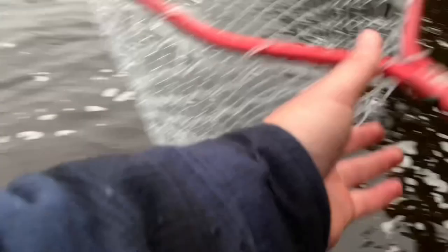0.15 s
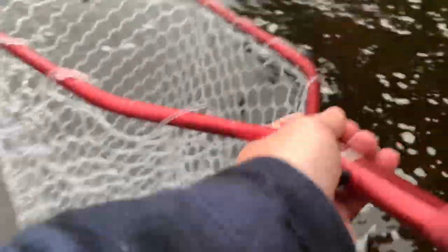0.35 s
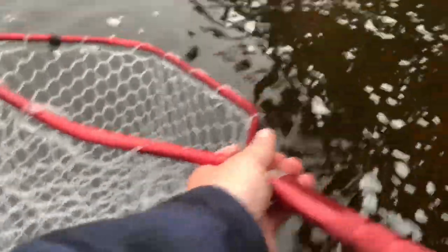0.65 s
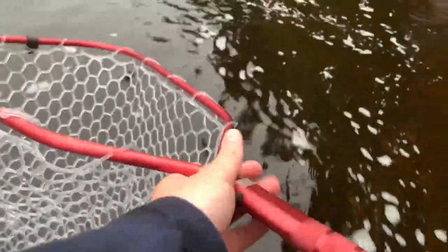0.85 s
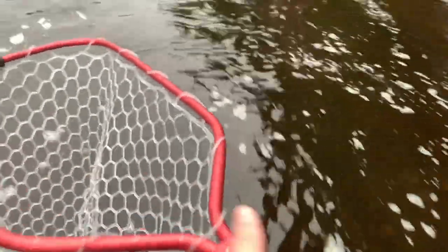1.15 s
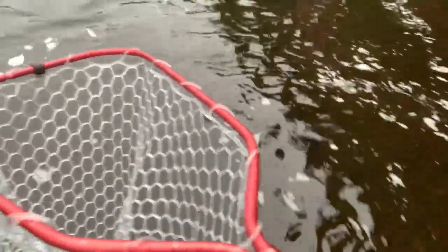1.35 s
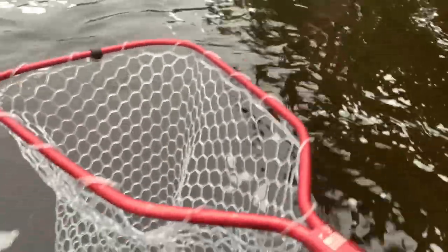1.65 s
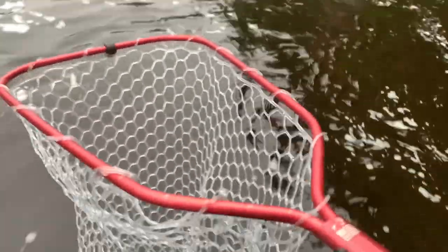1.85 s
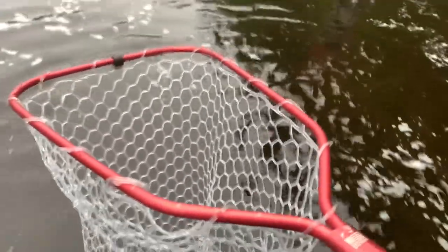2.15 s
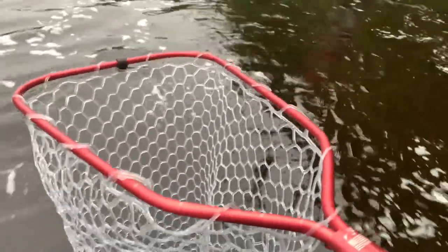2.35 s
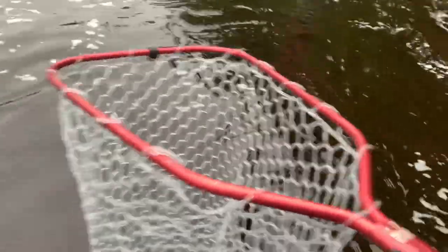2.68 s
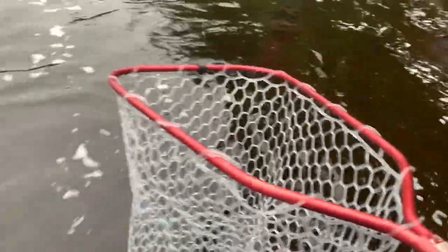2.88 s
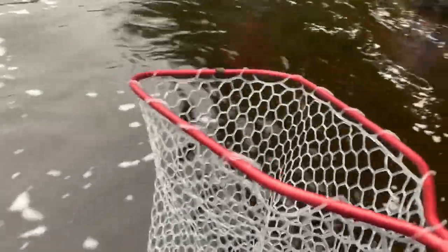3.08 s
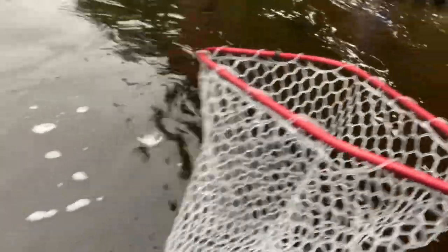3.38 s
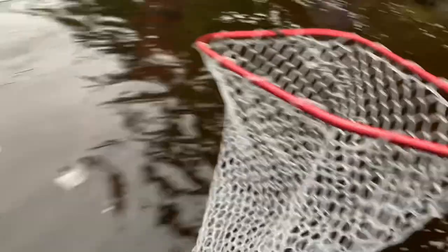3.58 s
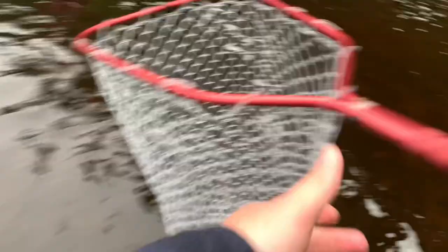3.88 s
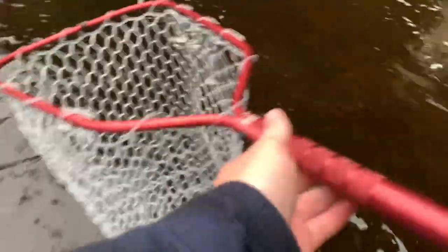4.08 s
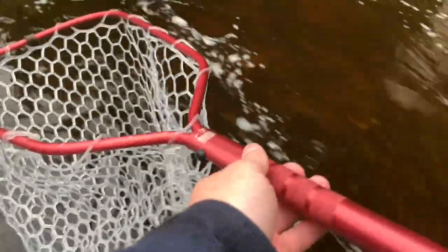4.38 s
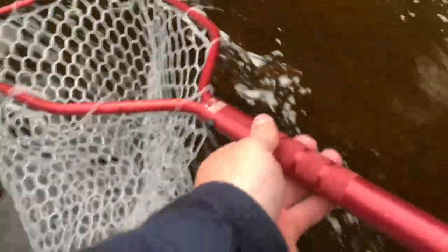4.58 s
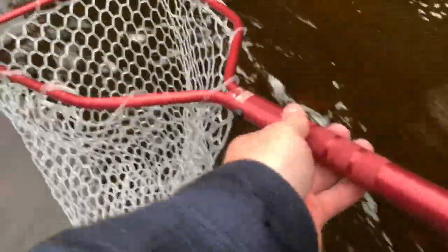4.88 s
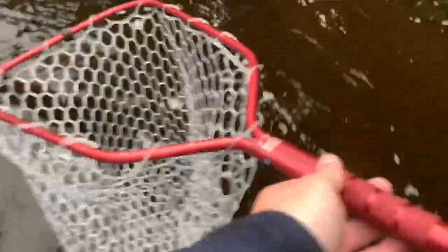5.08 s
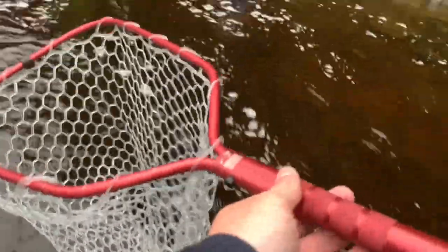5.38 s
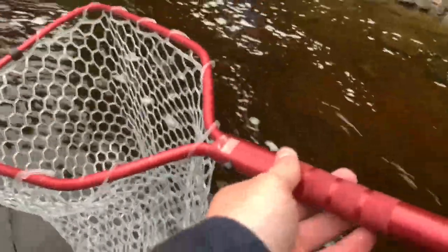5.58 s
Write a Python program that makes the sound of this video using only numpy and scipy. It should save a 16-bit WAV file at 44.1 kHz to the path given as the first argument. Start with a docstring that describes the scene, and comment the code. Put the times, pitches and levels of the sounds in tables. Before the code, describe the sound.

Close river current, steady and bassy, with light deep wind on the microphone. At first there are plops, wet clicks, sleeve hiss and a soft bump; then mostly flowing water and tiny bubbles. Dribbling and rubbing build up to rapid heavy handle knocks against the wearer's body, then the net swishes in two splashy surges, ending with a bright metal tink and small thuds.

```python
"""A river runs close past the two microphone ports of a body-worn camera, with more river further off.
Shaped noise and random small bubbles make its roar, slosh and wash; single bubbles ring; wind buffets the ports.
At hand, a metal landing net with a rubber mesh dribbles, rustles and ticks, and a sleeve hisses (noise, tones).
The hoop tinks in damped modes, and the handle thumps and grinds against the wearer (smeared pushes, noise)."""
import sys
import numpy as np
from scipy import signal
from scipy.fft import rfft, irfft, next_fast_len
from scipy.io import wavfile
from scipy.ndimage import uniform_filter1d, map_coordinates

SR = 44100
rng = np.random.default_rng(int(sys.argv[2]) if len(sys.argv) > 2 else 0)


def makeup_ratio(level_db):
    """Linear amplitude ratio for a level in decibels (20 dB per factor of ten)."""
    decades = np.asarray(level_db, float) / 20
    return 10 ** decades


def wav_out(sig):
    """Save sig, one row per channel (or a flat mono array), as 16-bit PCM at SR to the path in sys.argv[1]."""
    wavfile.write(sys.argv[1], SR, np.round(np.clip(np.atleast_2d(sig).T, -1, 1) * 32767).astype(np.int16))


N = 253134  # samples
TOP_HZ = 15900  # upper limit of the noise layers, ticks and hoop
LEAN = np.array([[.5], [-.5]])  # splits a left-over-right level [dB] between the ports


def unit(x):
    """Scaled to rms 1."""
    return x / np.sqrt(np.mean(x ** 2) + 1e-20)


def along(points, hz):
    """Reads (Hz, value) points on a log frequency axis."""
    f, v = np.transpose(points)
    return np.interp(np.log(hz + 1), np.log(f + 1), v)


def wobble(rate):
    """A smooth random curve, rate knots a second."""
    knots = rng.standard_normal(int(N * rate / SR) + 4)
    return map_coordinates(knots, [np.arange(N) * rate / SR])


def filtered(x, response):
    """x times a complex response of frequency."""
    m = next_fast_len(N + SR // 2)
    return irfft(rfft(x, m) * response(np.fft.rfftfreq(m, 1 / SR)), m)[..., :N]


def add(track, s, sound):
    """Mixes a sound in at time s."""
    part = track[..., max(round(s * SR), 0):][..., :sound.shape[-1]]
    part += sound[..., :part.shape[-1]]


def curves(rows):
    """One value per sample for each column after the time."""
    s, *cols = np.transpose(rows)
    return [np.interp(np.arange(N) / SR, s, c) for c in cols]


def strokes(rows, edge_s):
    """Gain of (start, end, dB) strokes with soft edges."""
    t = np.arange(N) / SR
    gain = 0
    for start, end, db in rows:
        inside = np.minimum(t - start, end - t)
        gain = gain + makeup_ratio(db) * np.clip(inside / edge_s + .5, 0, 1) ** 2
    return gain


# left-right correlation of the noise, which dips in several treble bands:
# (frequency [Hz], correlation [-1 to 1])
ALIKE = [(30, .95), (60, .94), (125, .95), (300, .88), (600, .55), (1200, .6), (2000, .4), (3000, .15),
         (6000, .25), (7500, .6), (8300, .99), (8900, .99), (9800, .7), (10800, .98), (11500, .98),
         (12400, .65), (13100, .99), (14000, .99), (14900, .7), (16000, .9)]


def rush(spectrum, patchy_db, grains, spread_db, grain_db):
    """Stereo noise of rms 1: random patches of gain, with sparse grains (so many a second) on top."""
    z = signal.stft(rng.standard_normal((2, N)), nperseg=512)[2]
    field = uniform_filter1d(rng.standard_normal(z.shape[1:]), size=6, axis=0)
    field = uniform_filter1d(field, size=8, axis=1)
    pair = signal.istft(z * makeup_ratio(patchy_db * unit(field)), nperseg=512)[1][:, :N]
    hits = rng.random(N) < grains / SR
    hits = hits * makeup_ratio(spread_db * np.minimum(rng.exponential(size=N), 4))
    pair = pair + makeup_ratio(grain_db) * unit(hits * rng.standard_normal((2, N)))

    def mid_side(hz):
        turn = np.arccos(np.clip(along(ALIKE, hz), -1, 1)) / 2
        return makeup_ratio(along(spectrum, hz)) * [np.cos(turn), np.sin(turn)]

    mid, side = filtered(pair, mid_side)
    return unit(np.array([mid + side, mid - side]))


def gurgle(rate, mid_hz, octaves, cycles, spread_db):
    """Random small bubbles, rms 1: damped, rising tones, each somewhere between left and right."""
    ports_apart_s = .0002
    at, pitch, size, side = rng.random((int(rate * N / SR), 4)).T[:, :, None]
    hz = mid_hz * np.exp2(octaves * (2 * pitch - 1))
    turns = hz * np.arange(1500) / SR
    fade = turns * np.exp(-3 * turns / cycles)
    tone = makeup_ratio(spread_db * size ** 2) * fade * np.sin(2 * np.pi * turns * (1 + 0.13 * turns / cycles))
    where = (at * N).astype(int) + np.arange(1500) + 20
    early = np.round(ports_apart_s * SR * (side - .5)).astype(int)  # the nearer port hears it first
    ports = []
    for k in (-1, 1):
        heard = tone * np.cos(np.pi / 4 + k * 1.77 * (side - .5))
        ports.append(np.bincount((where + k * early).ravel(), heard.ravel(), N)[:N])
    return unit(np.array(ports))


# near water before flutter and lean: (time [s], roar level [dB], slosh level [dB], wash level [dB])
FLOW = [(0, -31, -36.5, -43.5), (.24, -30.5, -35.5, -35), (.4, -30, -43, -43.5), (.68, -32.5, -38.5, -42.5),
        (.93, -35.5, -36, -37), (1.0, -35.5, -46, -42), (1.15, -33, -38, -42), (1.9, -32, -37.5, -47.5),
        (2.35, -33, -40, -50), (2.54, -32.5, -39.5, -43), (2.95, -33, -38, -49.5), (3.6, -33, -40.5, -40.5),
        (3.92, -38, -37.5, -46.5), (4.22, -35, -41, -39.5), (4.385, -38, -28.5, -33), (4.42, -36, -26, -31),
        (4.46, -33.5, -28.5, -31.5), (4.53, -37, -29, -32.5), (4.565, -34.5, -28.5, -29.5),
        (4.64, -36, -33, -32), (4.71, -35.5, -33.5, -34.5), (4.91, -30.5, -32, -34),
        (4.96, -27.5, -37, -32), (4.99, -25.5, -29, -36), (5.015, -31, -26, -32), (5.03, -28, -26, -30),
        (5.05, -31, -25, -29.5), (5.08, -24, -26, -27), (5.11, -28, -32, -26.5), (5.13, -28, -30, -26),
        (5.15, -26, -32, -28.5), (5.18, -28, -27.5, -28.5), (5.205, -34, -38, -38),
        (5.245, -29.5, -27, -33), (5.27, -26, -38, -33.5), (5.35, -36.5, -34.5, -37), (5.61, -34, -36, -39),
        (5.74, -30.5, -37, -35.5)]
# where it sits: (time [s], slosh left over right [dB], wash and mesh left over right [dB])
SIDES = [(0.0, 0.5, 1.5), (0.27, 1.5, 0), (0.43, 3, 3.5), (0.77, 2, 0.5), (1.85, 3.5, 3), (3.42, 5.5, 1.5),
         (4.04, 5, 0), (4.19, 5, -1.5), (4.67, 0.5, 1), (4.81, 0, -1.5), (5.6, 4.5, 1), (5.74, 8, -1.0)]
# relative noise spectra of the three: (frequency [Hz], density [dB])
ROAR = [(15, -69), (25, -32), (54, -9), (149, -2.5), (184, -0.5), (345, -6.5), (432, -13), (580, -17.5),
        (660, -32), (900, -41), (1170, -28), (1980, -120)]
SLOSH = [(120, -53), (230, -1.5), (400, 0.5), (600, -7), (900, -25), (2000, -63)]
WASH = [(300, -55), (600, 4), (900, 2), (1300, -1.5), (1900, -10.5), (3500, -34), (8000, -70)]


def near_water():
    """Close current: turbulent noise and bubbles in three bands whose levels flow and flutter."""
    roar_db, slosh_db, wash_db = curves(FLOW)
    low_side, high_side = curves(SIDES)
    low_db, high_db = low_side * LEAN, high_side * LEAN
    roar = rush(ROAR, patchy_db=0.54, grains=200, spread_db=1.0, grain_db=-5.5)
    roar = roar + makeup_ratio(-8.0) * gurgle(rate=40, mid_hz=200, octaves=1.2, cycles=2.74, spread_db=9.5)
    slosh = rush(SLOSH, patchy_db=2.5, grains=250, spread_db=2.5, grain_db=-10.5)
    slosh = slosh + makeup_ratio(-9.5) * gurgle(rate=50, mid_hz=383.5, octaves=0.697, cycles=7.1, spread_db=6.5)
    wash = rush(WASH, patchy_db=1.5, grains=400, spread_db=3.5, grain_db=-8.0)
    wash = wash + makeup_ratio(-9.0) * gurgle(rate=130, mid_hz=1100, octaves=0.785, cycles=6.44, spread_db=9.0)
    trickle = gurgle(rate=80, mid_hz=1299, octaves=0.81, cycles=11.5, spread_db=8)  # drips
    wash = wash + makeup_ratio(-11.5) * trickle
    # the roar leans only about a third as far as the slosh
    roar = makeup_ratio(roar_db + 0.37 * low_db + 0.42 * wobble(30)) * roar
    slosh = makeup_ratio(slosh_db + low_db + 0.34 * wobble(25)) * slosh
    wash = makeup_ratio(wash_db + high_db + 0.46 * wobble(20) + 1.4 * wobble(60)) * wash
    return roar + slosh + wash


# relative noise spectrum of the far river: (frequency [Hz], density [dB])
FAR = [(300, -30), (800, -7), (1500, -3.5), (3000, 2.5), (6000, -17), (10000, -44), (15700, -11)]


def far_river():
    """The distant current blends into noise of constant overall level, sprinkled with grains."""
    return makeup_ratio(-55.5) * rush(FAR, patchy_db=3.0, grains=180, spread_db=16, grain_db=-24)


# wind on the ports before flutter: (time [s], level [dB])
BUFFET = [(0, -54), (.8, -44), (1.6, -52), (2.7, -48), (3.1, -49), (3.7, -35), (3.8, -39), (3.92, -43),
          (4.6, -42), (5.2, -44), (5.74, -46)]
# its relative noise spectrum: (frequency [Hz], density [dB])
GUST = [(30, -42), (50, -2.5), (70, 1), (95, 1), (150, -45.5)]


def wind():
    """Wind at the microphone ports: fluttering noise confined to the deep bass."""
    gust = rush(GUST, patchy_db=1.5, grains=60, spread_db=4.5, grain_db=-6)
    return makeup_ratio(curves(BUFFET)[0] + 1.4 * wobble(11)) * gust


# rubbing before brushes and flutter: (time [s], mesh rustle level [dB], sleeve hiss level [dB])
RUB = [(0, -46.5, -50.5), (.22, -41.5, -41.5), (.34, -47, -54), (.4, -50, -41.5), (.74, -43.5, -42),
       (.82, -45.5, -52), (.93, -39.5, -43.5), (1.01, -47.5, -48), (1.34, -46.5, -50.5), (1.42, -52.5, -56),
       (1.68, -51, -54), (2.2, -57, -65.5), (2.42, -52.5, -54), (2.97, -51.5, -56), (3.15, -52, -53),
       (3.54, -41, -41.5), (3.74, -43, -45), (3.88, -44.5, -54), (3.95, -42.5, -45), (4.0, -39, -44),
       (4.18, -39, -41), (4.35, -36, -39.5), (4.41, -29.5, -34), (4.45, -31.5, -35), (4.5, -31, -35),
       (4.57, -33, -30.5), (4.62, -34.5, -34.5), (4.8, -39, -41.5), (4.98, -38, -41.5), (5.03, -34.5, -39),
       (5.08, -33, -31.5), (5.11, -32.5, -34.5), (5.15, -32, -35), (5.19, -35, -38), (5.21, -37, -40),
       (5.235, -33.5, -40), (5.27, -39, -40.5), (5.44, -36, -36), (5.55, -43, -45), (5.74, -38.5, -43)]
# short brushes: (time of peak [s], lift of the sleeve [dB]); the mesh gets 0.69 of the lift
BRUSHES = [(1.181, 10), (1.64, 8), (2.34, 12), (3.015, 11), (3.115, 11.5), (4.96, 7.5), (5.066, 3)]
# relative noise spectra of mesh and sleeve: (frequency [Hz], density [dB])
MESH = [(500, -15.5), (1300, -1), (2000, 1), (2900, -3), (3900, -2.5), (4600, -5), (5600, -11.5),
        (7000, -10), (8000, -70)]
SLEEVE = [(4000, -20), (6500, -1.5), (7800, -2), (10000, 0.5), (12500, -3.5), (15700, -1)]


def rubbing():
    """Rubber mesh and sleeve rub close by: friction noise that swells and flutters partly together."""
    rise_s, fall_s = 0.0059, 0.0082  # time constants of a brush
    mesh_db, sleeve_db = curves(RUB)
    t = np.arange(N) / SR
    brush_db = sum(db * np.exp(np.minimum((t - s) / rise_s, (s - t) / fall_s)) for s, db in BRUSHES)
    rub = wobble(45)  # shared flutter
    mesh = rush(MESH, patchy_db=2.05, grains=700, spread_db=3.5, grain_db=-5.5)
    mesh = mesh + makeup_ratio(-13.5) * gurgle(rate=150, mid_hz=2890, octaves=0.92, cycles=4.8, spread_db=2.0)
    droplets = gurgle(rate=220, mid_hz=3394, octaves=0.486, cycles=7.9, spread_db=10)  # flung off the knots
    mesh = mesh + makeup_ratio(-12) * droplets
    side_db = curves(SIDES)[1] * LEAN
    mesh = makeup_ratio(side_db + mesh_db + 0.69 * brush_db + rub + 0.16 * wobble(15)) * mesh
    sleeve = rush(SLEEVE, patchy_db=3.0, grains=200, spread_db=2.0, grain_db=-6)
    flutter_db = 0.66 * rub + 1.07 * wobble(110) + 1.54 * wobble(10)
    return mesh + makeup_ratio(sleeve_db + brush_db + flutter_db) * sleeve


# water runs off the lifted mesh: (start [s], end [s], level [dB])
DRIBBLE = [(.04, .33, -45.5), (.78, 1.0, -46), (1.03, 1.5, -53.5), (2.4, 2.53, -57), (2.53, 2.63, -48),
           (3.0, 3.35, -59), (3.35, 3.5, -45.5), (3.5, 3.72, -42), (3.95, 4.3, -43.5), (5.08, 5.17, -31)]


def dribble():
    """Water dribbling off the net: spells of dense, small, damped bubble tones."""
    drops = gurgle(rate=400, mid_hz=1210, octaves=0.452, cycles=7, spread_db=14)
    return strokes(DRIBBLE, edge_s=0.068) * drops


# single bubbles before onset and shake:
# (time [s], level [dB], starting pitch [Hz], phase stretch over a 60 dB fade [share])
BUBBLES = [(.047, -21.5, 1340, 0.087), (.114, -26, 900, .1), (.185, -22, 1110, .05), (.495, -28, 756, .05),
           (.816, -23, 890, .05), (.893, -21, 1300, .05), (.918, -20, 1120, .05), (.993, -28, 1500, .05),
           (1.714, -29, 810, .05), (2.539, -37, 1080, .05), (3.33, -33, 1900, .1), (3.36, -32, 1800, .05),
           (3.418, -31, 651, 0.041), (3.575, -30, 1180, .05), (3.615, -31, 1300, .05),
           (3.635, -30, 1250, .05), (3.963, -30, 950, .05), (3.978, -25.5, 668, .05), (4.08, -24, 1160, .1),
           (4.121, -27, 1180, .05), (4.215, -20, 1510, .05), (4.56, -14, 850, 0.054),
           (4.925, -27, 666, .05), (.217, -20.5, 1950, .05), (.237, -20.5, 1880, .03),
           (.25, -26, 1350, .05), (.262, -27, 2100, .03), (.348, -25, 1350, .05), (.634, -18, 515, 0.054),
           (.697, -15.5, 750, 0.018), (1.178, -12, 1590, 0.076), (1.78, -29, 1056, 0.092),
           (2.256, -32, 1280, 0.096), (2.3, -36, 1800, .1), (2.3, -35, 620, .05), (2.44, -32, 1050, .05),
           (2.565, -34, 1500, .05), (2.42, -31.5, 820, 0.17), (2.474, -23.5, 980, 0.065),
           (2.574, -26, 910, .05), (2.582, -27, 753, 0.082), (2.617, -37, 1150, .1), (2.68, -33, 757, .1),
           (3.003, -33.5, 1027, 0.69), (3.032, -29.5, 1180, 0.25), (3.118, -32, 1870, .2),
           (3.237, -25.5, 1750, 0.092), (3.238, -31, 615, .09), (3.273, -26, 1100, 0.093),
           (3.314, -35, 767, .1), (3.34, -21.5, 1370, 0.12), (3.417, -27, 1220, 0.17),
           (3.499, -24, 1130, 0.055), (3.54, -25, 1220, .1), (3.662, -24, 1220, .1),
           (4.016, -12.5, 1340, 0.022), (4.306, -18, 2450, 0.054), (4.416, -11.5, 940, 0.034),
           (4.582, -15, 1590, .03), (5.056, -15.5, 440, 0.034), (4.68, -18, 385, 0.1)]


def bubbles():
    """Each bubble rings softly and rises in pitch as it nears the surface; small ones die sooner."""
    onset_s = .0011
    fade_cycles, cycles_per_rise = 15.7, 170  # 60 dB fade, at starting pitch; far risers live longer
    out, t = np.zeros(N), np.arange(SR // 8) / SR
    shake = wobble(180)  # the surface around a bubble is never still
    for s, db, hz, rise in BUBBLES:
        life = t * hz / (fade_cycles + cycles_per_rise * rise)
        ring = np.sin(2 * np.pi * hz * t * (1 + rise * life))
        envelope = makeup_ratio(db - 60 * life) * (1 - np.exp(-t / onset_s))
        add(out, s, envelope * ring * makeup_ratio(3.15 * shake[round(s * SR):][:len(t)]))
    return out * makeup_ratio(2.4 * LEAN)


# the clearest mesh ticks, before onset and click mix: (time [s], level [dB], tone [Hz])
TICKS = [(.0622, -22, 7170), (.0635, -22, 3230), (0.074, -18, 3980), (0.0787, -18, 3650),
         (0.1036, -22.5, 3760), (.1225, -19, 2900), (.142, -29, 4000), (.182, -18.5, 3950),
         (.199, -20, 4120), (0.21, -18, 4100), (.223, -24, 3100), (.238, -28, 4000), (0.294, -24, 3650),
         (.617, -19, 3330), (.189, -28, 15400), (.2024, -23, 15000), (.2209, -26, 10500),
         (.3905, -31, 11400), (.4489, -25, 2160), (.466, -25, 3300), (.475, -25, 3200), (.5257, -21, 2050),
         (0.588, -27, 3030), (.9, -21, 3950), (.9148, -32, 10900), (1.1767, -23, 4000),
         (1.8334, -30, 10000), (2.0238, -39, 11600), (2.0245, -36, 5000), (2.21, -36, 4800),
         (2.225, -38, 5800), (2.3306, -36, 2000), (2.7177, -31, 10200), (2.806, -35, 12000),
         (2.9996, -38, 10600), (3.8985, -32, 9710), (3.9779, -32, 9920), (4.0871, -21, 2300),
         (4.115, -19, 3650), (4.1744, -21, 2020), (4.2043, -23, 3200), (4.5281, -25, 11100),
         (4.873, -28, 10400), (4.9132, -26, 11600), (5.026, -19, 1910), (5.078, -22, 2500),
         (5.228, -21, 4300), (5.3168, -23, 11300), (5.4326, -24, 10100), (5.5767, -26, 15000),
         (.7911, -27, 2870), (0.897, -25, 2340), (1.042, -27, 4020), (1.057, -18, 3200), (1.059, -22, 2520),
         (1.1, -13.5, 8400), (1.1777, -30, 7630), (1.3164, -28, 11000), (1.3527, -28, 11000),
         (1.194, -31, 9500), (1.215, -31, 10500), (1.316, -28, 4400), (1.6475, -29, 4030),
         (1.7787, -29, 9900), (1.9385, -31, 12000), (2.348, -28, 9900), (2.902, -32, 10100),
         (3.018, -27, 2980), (3.036, -31, 2700), (3.184, -27.5, 10900), (3.185, -27, 3300),
         (3.238, -26, 2700), (3.498, -26, 4200), (3.4134, -21, 2820), (3.7594, -13.5, 5030),
         (3.7818, -5.5, 2450), (3.84, -31, 2480), (3.913, -15, 4020), (4.017, -24, 2340),
         (4.2257, -18, 2350), (4.2492, -22, 2830), (4.3051, -18, 2330), (4.343, -15.5, 7150),
         (4.377, -15, 3800), (4.409, -12, 2060), (4.42, -19, 2880), (4.482, -17, 4200), (4.496, -13, 3630),
         (4.559, -14.5, 3200), (4.564, -16.5, 2620), (4.587, -17, 3850), (4.6985, -18, 3400),
         (4.895, -22, 3780), (4.959, -21.5, 10200), (5.0668, -11.5, 9770), (5.3767, -22, 2820),
         (5.53, -22.5, 3080)]


def ticks():
    """Wet mesh knots snap: a wide click with one damped tone; small ones follow the rustle."""
    small_per_s, small_db_over_rustle, small_hz = 16, 12, 3200
    snappy_hz, rise_cycles, t60_s = 40000, 0.82, 0.0079  # the higher a tick, the more of it is click
    out, t = np.zeros(N), np.arange(400) / SR
    at, size, pitch = rng.random((int(small_per_s * N / SR), 3)).T
    rustle_db = curves(RUB)[0][(at * N).astype(int)]
    small_db = rustle_db + small_db_over_rustle + 6 * (size - .5)
    small = list(zip(at * N / SR, small_db, small_hz * np.exp2(.7 * (pitch - .5))))
    for s, db, hz in TICKS + small:
        click = np.diff(rng.standard_normal(len(t) + 1)) * (0.18 + hz / snappy_hz)
        tone = 0.62 * np.sin(2 * np.pi * hz * t)
        envelope = makeup_ratio(db - 60 * t / t60_s) * (1 - np.exp(-t * hz / rise_cycles))
        add(out, s, envelope * (click + tone))
    return out


# hoop contacts: (time [s], gain on the ring [dB])
TINKS = [(.062, -31), (1.0568, -17), (1.1015, -10), (1.111, -16), (1.1458, -25), (5.4912, -0.5)]
# modes of the hoop: (frequency [Hz], level in the ring [dB], 60 dB decay [s])
HOOP = [(7690, -8, 0.028), (7550, -8, 0.0097), (9660, -14, 0.0063)]
# a hand slides on the hoop: (start [s], end [s], level before flutter [dB])
SLIDE = [(.385, .42, -43), (.6, .77, -50), (1.06, 1.2, -53)]


def hoop():
    """Every contact rings the metal hoop's modes; a sliding hand excites the same modes with noise."""
    out, t = np.zeros(N), np.arange(SR // 10) / SR
    ring = sum(makeup_ratio(db - 60 * t / t60) * np.sin(2 * np.pi * hz * t) for hz, db, t60 in HOOP)
    for s, db in TINKS:
        add(out, s, makeup_ratio(db) * (1 - np.exp(-t / 0.00069)) * ring)
    friction = unit(signal.fftconvolve(rng.standard_normal(N), ring)[:N])
    return out + friction * strokes(SLIDE, edge_s=.025) * makeup_ratio(1.7 * wobble(39.2))


# thumps: (time [s], push peak before lean [dB], bottom of push [Hz], top of push [Hz],
# crack level before its tone [dB])
THUMPS = [(.143, -18, 120, 394, -41), (.697, -12, 70, 895, -26.5), (3.2378, -26, 500, 1000, -39),
          (3.7598, -0.5, 55.6, 604, -15), (3.779, -10, 150, 950, -29), (3.7824, -11, 60, 850, -13),
          (3.7916, -2, 150, 700, -13.5), (3.7938, -25, 300, 800, -18), (3.7956, -6, 150, 500, -30),
          (3.802, -15, 40, 402, -25), (3.81, -19, 150, 600, -42), (3.8185, -13, 80, 553, -22),
          (3.842, -4, 200, 656, -23), (3.85, -16, 300, 600, -44), (3.856, -19, 250, 600, -39),
          (3.861, -15, 250, 500, -29), (3.8643, -4, 260, 454, -21.5), (3.87, -17, 300, 500, -42),
          (3.878, -23.5, 70, 160, -49), (3.913, -37, 300, 900, -29), (4.0175, -4, 292, 730, -28),
          (4.023, -12.5, 70, 595, -25), (4.042, -18.5, 70, 380, -50), (4.417, -20, 300, 1210, -29),
          (4.425, -30, 300, 900, -34), (4.466, -21, 150, 500, -42), (4.603, -21.5, 120, 500, -42),
          (4.6085, -15, 60, 450, -42), (5.009, -19, 250, 800, -39), (5.139, -21, 150, 600, -34),
          (5.1741, -14, 50, 330, -33), (5.532, -25, 70, 400, -31), (5.59, -24, 200, 900, -39),
          (5.71, -21, 200, 900, -34)]
# tone of the cracks: (frequency [Hz], gain [dB])
CRACK = [(400, 17), (1500, 4.5), (3000, 2.5), (5000, 1.5), (6500, -4.5), (10000, -5.5), (16000, -21)]
# the handle grinds along the wearer: (start [s], end [s], level before its tone [dB])
GRIND = [(3.762, 3.83, -56), (3.784, 3.791, -26), (3.797, 3.807, -22), (3.808, 3.818, -42),
         (3.843, 3.851, -35), (3.858, 3.871, -30.5)]
# tone of the grinding: (frequency [Hz], gain [dB])
GRIND_TONE = [(400, 18), (1500, 7), (2600, 6), (4000, -0.5), (6000, -6), (8500, -14), (16000, -26)]


def thumps(turns=1.216, left_lag=0.00052, tilt=0.29, twist=1.0):
    """A short push, smeared by the microphone's phase response: treble first, so each falls in pitch."""
    crack_t60_s, hard_left_over_right_db = 0.0083, 4.5
    pushes, cracks = np.zeros((2, 2, N))
    hz, t = np.fft.rfftfreq(4096, 1 / SR)[1:], np.arange(1500) / SR
    delay_s = 0.00193 + np.array([[left_lag], [0]])
    smear = np.exp(-2j * np.pi * (turns * np.log(hz / 1500) + hz * delay_s))
    smear = smear * hz ** -tilt * np.exp(1j * twist)  # a heavy push is strongest in the bass
    for s, db, low_hz, top_hz, crack_db in THUMPS:
        push = smear / (1 + (low_hz / hz) ** 3) / (1 + (hz / top_hz) ** 6)
        both = irfft(np.pad(push, ((0, 0), (1, 0))))[:, :2048]
        add(pushes, s - .002, makeup_ratio(db) * both / np.abs(both).max())
        noise = np.dot([[1, 0.83], [1, -0.55]], rng.standard_normal((2, len(t))))
        add(cracks, s, makeup_ratio(crack_db - 60 * t / crack_t60_s) * noise)
    scrape = np.dot([[1, 1.0], [1, -0.8]], rng.standard_normal((2, N)))
    grind = strokes(GRIND, edge_s=0.005) * makeup_ratio(1.0 * wobble(300)) * scrape
    hard = filtered(cracks, lambda f: makeup_ratio(along(CRACK, f)))
    hard = hard + filtered(grind, lambda f: makeup_ratio(along(GRIND_TONE, f)))
    return pushes * makeup_ratio(.6 * LEAN) + hard * makeup_ratio(hard_left_over_right_db * LEAN)


def scene():
    """All sources at the two ports."""
    limited = near_water() + far_river() + wind() + rubbing() + dribble() + ticks() + hoop()
    return filtered(limited, lambda hz: hz < TOP_HZ) + bubbles() + thumps()


def roll_off(x):
    """The treble ends steeply here."""
    return signal.sosfilt(signal.butter(12, 17020, fs=SR, output="sos"), x)


# the treble crosses between the ports in a fifth of a millisecond: (frequency [Hz], lag of left [rad])
LAG = [(0, -.1), (300, -.2), (1000, -.35), (2000, -.5), (3500, -1.5), (6200, 0), (8600, 3.14),
       (13450, 9.42), (16500, 13.4)]


def record(dry):
    """The microphone ports hear the treble at different times; peaks round off softly."""
    clip = .98  # full level of the ports
    f, lag = np.transpose(LAG)

    def port_response(hz):
        return np.exp(-1j * np.interp(hz, f, lag) * LEAN) * (hz < 16700)

    ports = filtered(dry, port_response)
    mix = ports / (1 + np.abs(ports / clip) ** 8) ** (1 / 8)
    return roll_off(mix)


dry = scene()
out = record(dry)
wav_out(out)
```